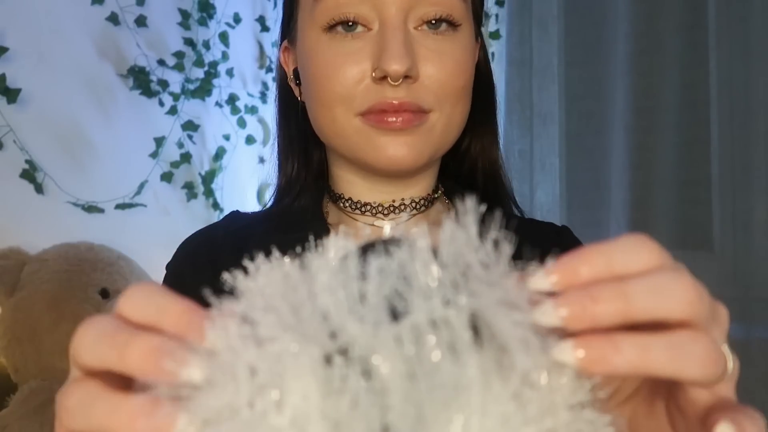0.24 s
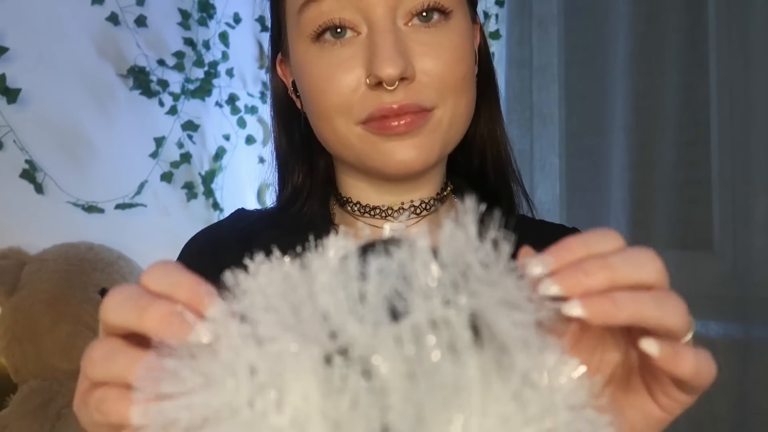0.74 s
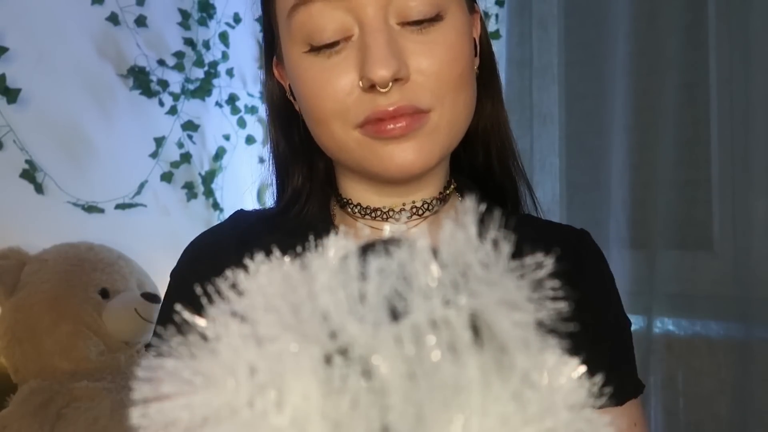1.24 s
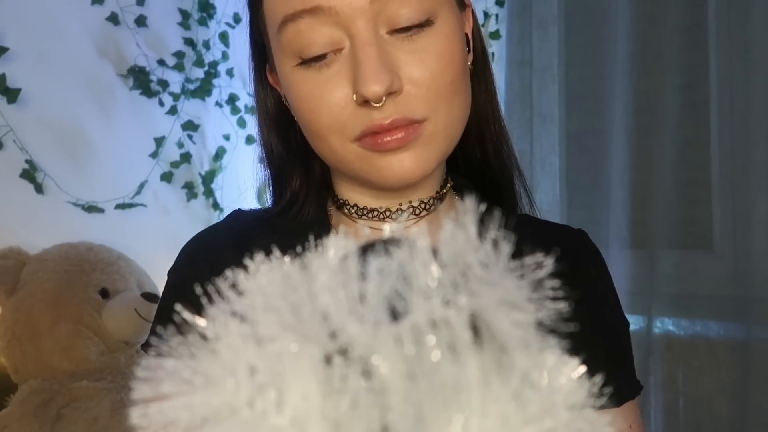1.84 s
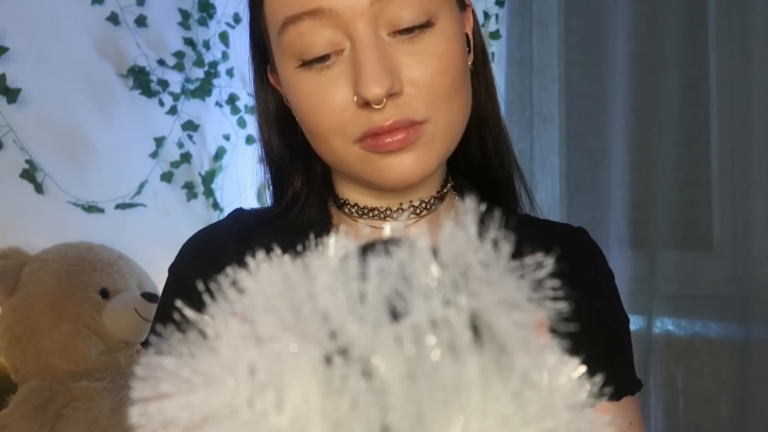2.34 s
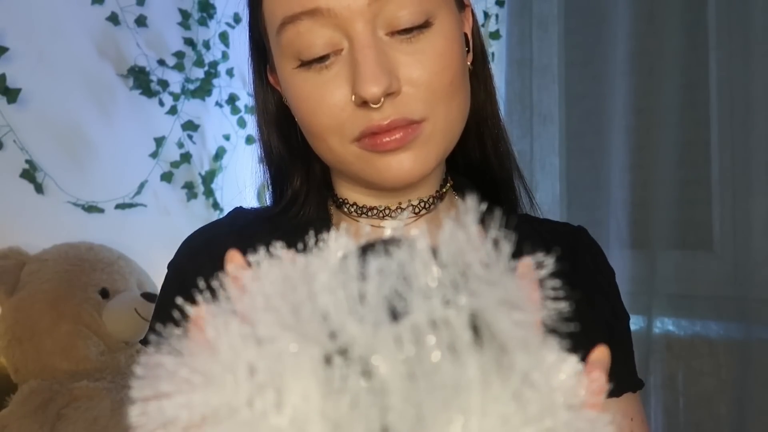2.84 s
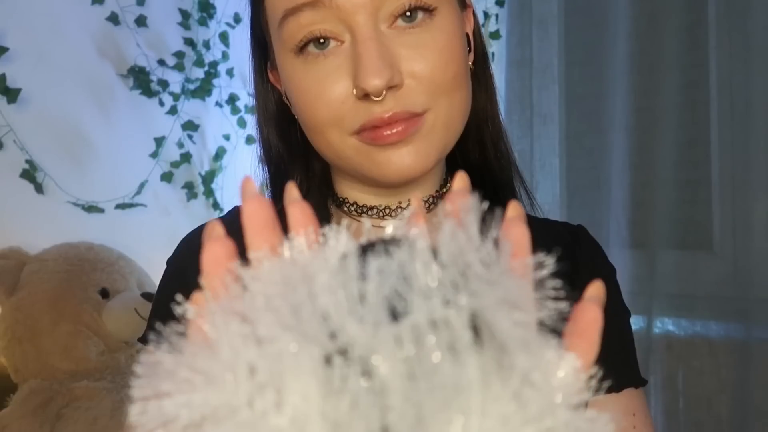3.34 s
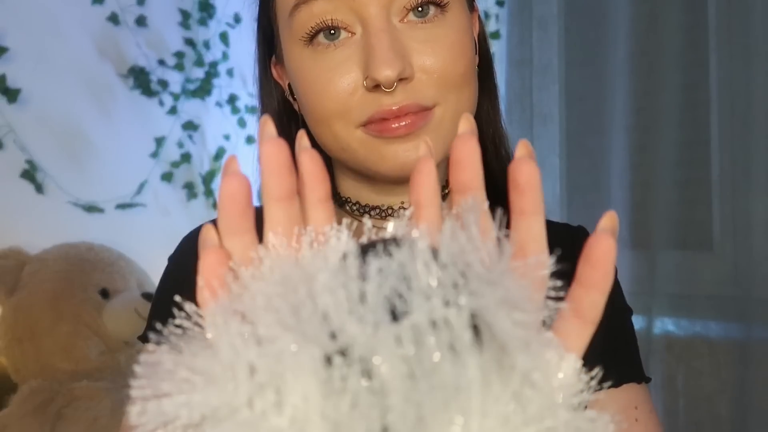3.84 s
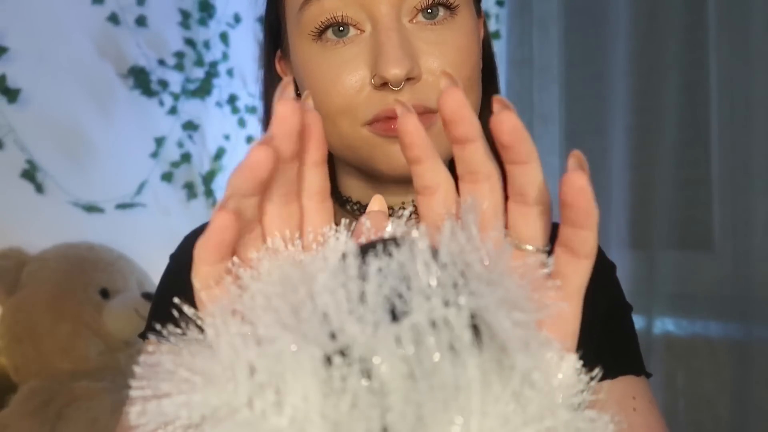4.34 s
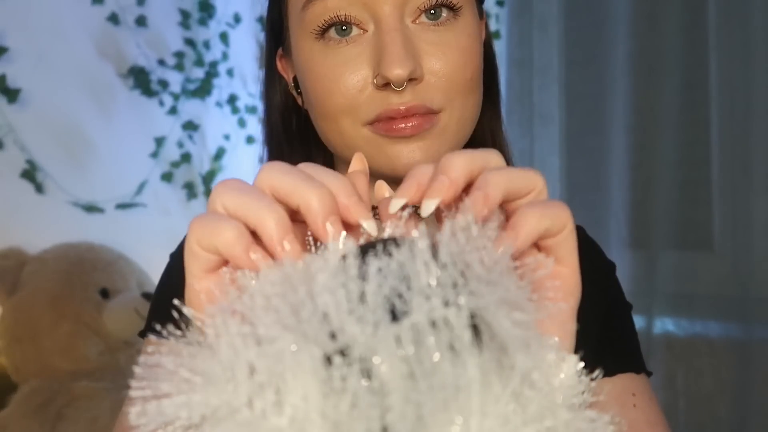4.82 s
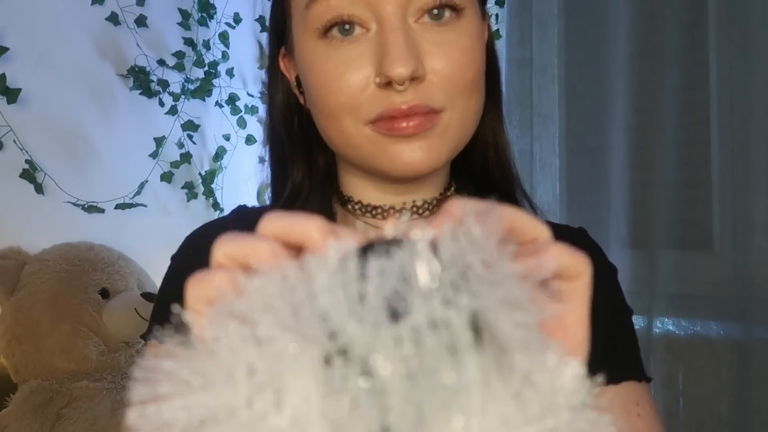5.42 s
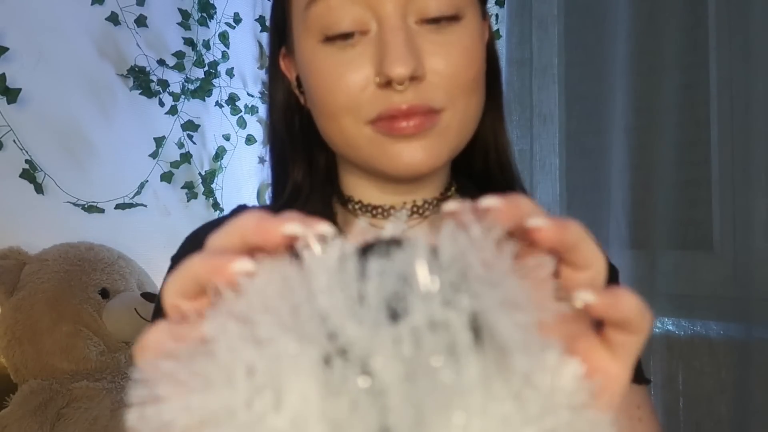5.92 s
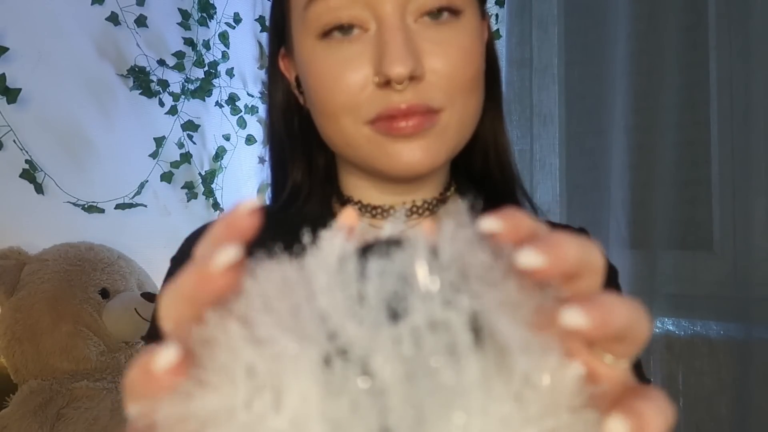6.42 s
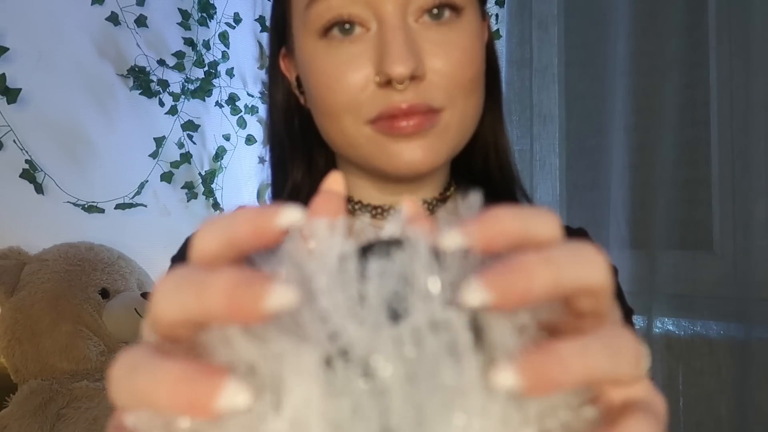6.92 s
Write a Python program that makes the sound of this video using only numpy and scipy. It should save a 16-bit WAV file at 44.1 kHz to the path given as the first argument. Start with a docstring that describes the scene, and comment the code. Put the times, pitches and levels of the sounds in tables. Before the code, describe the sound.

A tinsel garland wrapped over a microphone is handled in a quiet room, extremely close, dry and mono. From 0 to 0.3 s a bright crinkly burst with snaps, brushes and low lurches; it thins to light ticking and fades by 1 s. Until about 1.6 s there is almost nothing but faint room noise and very soft taps. From 1.7 s low rumble and a soft rustle creep back, swelling by 2.6 s, with one sharp snap near 2.4. From 2.6 to 4.7 s a continuous fine, gritty, fizzing rustle, slightly dipping around 4.2, over wavering low rumble. At 4.8 s a snap, sizzle and dull knock; then squeezing gets denser and brighter, with frequent snaps and lurching thumps at 5.4-5.9 s. After a slight easing near 6.5 s, a deep push follows, then a strong crackly brush and knock around 6.85 s, rustling on to the end at about 7.2 s.

```python
"""A quiet room: fingers stroke and squeeze a tinsel garland wrapped over a mono microphone.
Thousands of thin plastic strands rustle as damped ticks and noise, swelling in clumps.
Some strands snap free with a short ring and drag past their neighbours; bunches brush by and sizzle.
Pressure on the microphone body adds low rumble, lurches and dull knocks over faint room noise."""
import sys
import numpy as np
from scipy import signal
from scipy.fft import rfft, irfft, next_fast_len
from scipy.io import wavfile
from scipy.ndimage import uniform_filter1d, map_coordinates

SR = 44100
rng = np.random.default_rng(int(sys.argv[2]) if len(sys.argv) > 2 else 0)


def dump(signal):
    """Clip the signal to [-1, 1] and save it as 16-bit WAV at the path in sys.argv[1]."""
    limited = np.clip(np.atleast_2d(signal).T, -1, 1)
    pcm = np.round(limited * 32767).astype(np.int16)
    wavfile.write(sys.argv[1], SR, pcm)


N = 316197

# Stroke of the fingers, before layer trims: (time [s], rustle level [dB], sparkle over rustle [dB])
STROKE_CURVE = [(0.0, -60.5, 4.5), (0.14, -53.5, 2), (0.36, -59.5, 0), (0.7, -62, 2), (0.86, -67.5, 0.5),
                (1.0, -71, -6), (1.58, -71, -3.5), (1.66, -67.5, -7), (2.1, -59, -4), (2.6, -52.5, -4),
                (3.83, -51, -2), (4.2, -54.5, -1.6), (4.8, -51.5, -0.3), (5.12, -53.5, 0),
                (5.22, -50, -1.6), (5.9, -49.5, 1.5), (6.52, -52, -2), (6.56, -49, 0.5), (6.82, -50, 3),
                (7.17, -51, -2)]
# Grip on the housing, before random unevenness: (time [s], body rumble level [dB], push over body [dB])
GRIP_CURVE = [(0.0, -42.5, -15), (0.1, -40, -6), (0.7, -49.5, -0.5), (1.2, -68.5, -5), (1.55, -64, -1),
              (1.75, -53.5, -13), (2.35, -43, -6.5), (3.24, -42, -2), (3.8, -42.5, 1), (4.2, -43, -3),
              (4.8, -42, 2), (5.03, -44.5, -3), (5.17, -39.5, -3.5), (5.8, -40, 1), (6.48, -42, 2),
              (6.59, -38.5, 7.5), (6.67, -40, 0), (6.84, -37, 2), (6.93, -40.5, 0.5), (7.17, -41.5, -1.5)]
# Colour of strands under the palms: (frequency [Hz], relative level [dB])
PALM_COLOUR = [(900, -55), (1800, -10), (3000, -3.5), (4200, -1.5), (6500, -0.5), (8500, -3.5),
               (11000, -11), (17000, -40)]


def garland():
    """The rustle of many strands; bunches slipping lift it, some everywhere, some in one part."""
    # Strands at the grille: (frequency [Hz], relative level [dB])
    sparkle_colour = [(3000, -59), (6500, -3.5), (8500, -5.5), (11000, -2.5), (15000, -0.5), (18000, -24)]
    # Skin and strands on the grille: (frequency [Hz], relative level [dB])
    scuff_colour = [(250, -19), (450, 3), (700, -3), (1200, -8), (2200, -13), (4000, -21.5)]
    palms_db, grille_db, scuff_trim_db, crinkle_db = -1.2, 1.2, -14.5, -5.5  # layers against the stroke

    shared_bunch = np.minimum(clumps(rate=41, rise=0.0036, life=0.004, spike_db=2.0), 1.6)
    palm_swell = unit(1 + 0.27 * shared_bunch + 0.31 * local_bunches())
    grille_swell = unit(1 + 0.48 * shared_bunch + 0.66 * local_bunches())
    scuff_swell = unit((1 + 0.77 * shared_bunch) * amp(1.1 * wobble(12)))

    palms = ticks(5300, 0.33, cycles=1.23, spike_db=1.5, count=30000) + 1.9 * rng.standard_normal(N)
    grille = ticks(12730, 0.4, cycles=1.9, spike_db=2.0, count=30000) + 0.93 * rng.standard_normal(N)
    rustle = palm_swell * coloured(patchy(palms, patchy_db=1.5), PALM_COLOUR)
    sparkle = grille_swell * coloured(patchy(grille, patchy_db=2.0), sparkle_colour)
    scuff = scuff_swell * coloured(rng.standard_normal(N), scuff_colour)
    # Single strands heard apart, each a needle-sharp tick
    crinkle = ticks(9300, 0.25, cycles=0.72, spike_db=2.0, count=2500)

    rustle_db, sparkle_db = curves(STROKE_CURVE)
    rustle_db = rustle_db - 2.5 * np.maximum(wobble(35) - 0.3, 0)  # the fingers falter for a moment
    grip_db = curves(GRIP_CURVE)[0]
    # Scuffing is strongest when the fingers work at the grille
    scuff_db = 0.55 * rustle_db + 0.99 * sparkle_db + 0.3 * grip_db + scuff_trim_db
    return (amp(rustle_db + palms_db) * rustle
            + amp(rustle_db + sparkle_db + grille_db) * sparkle
            + amp(scuff_db) * scuff
            + amp(rustle_db + 1.05 * sparkle_db + crinkle_db) * crinkle)


def local_bunches():
    """Shorter, more uneven slips heard in one part of the garland only."""
    return np.minimum(clumps(rate=46, rise=0.0018, life=0.0036, spike_db=5.0), 2.4)


def clumps(rate, rise, life, spike_db):
    """Bunches of strands slip together: gain swells, rate a second, with rise and life time constants [s]."""
    starts = (rng.random(N) < rate / SR) * amp(spike_db * rng.standard_normal(N))
    after = signal.lfilter([1], [1, -np.exp(-1 / (life * SR))], starts)
    before = signal.lfilter([1], [1, -np.exp(-1 / (rise * SR))], starts[::-1])[::-1]
    return after + before - starts


def ticks(centre_hz, spread, cycles, spike_db, count):
    """Strands touch at random moments: tiny damped sines of uneven strength and pitch."""
    start = rng.integers(0, N, count)[:, None]
    hz = centre_hz * np.exp(spread * rng.standard_normal((count, 1)))
    hz = np.clip(hz, 2000, SR * 0.4)
    size = amp(spike_db * np.minimum(rng.exponential(1, (count, 1)), 5.5))
    k = np.arange(72)  # samples in one tick
    decay = np.exp(-k / SR * hz / cycles)
    grain = size * decay * np.sin(2 * np.pi * hz * k / SR)
    return unit(np.bincount((start + k).ravel(), grain.ravel(), N + len(k))[:N])


def snaps():
    """A bent strand creeps, springs free with a crack and a few cycles, then drags past its neighbours."""
    # Strands let go: (time [s], ring level [dB], pitch [Hz])
    snap_rows = [(0.0733, -27.0, 10000.0), (0.1198, -29.0, 7400.0), (0.1275, -26.5, 12100.0),
                 (0.373, -35.5, 13200.0), (0.4563, -35.0, 9600.0), (0.4788, -35.0, 7600.0),
                 (0.6065, -34.5, 12100.0), (0.6844, -29.5, 12200.0), (0.8214, -38.5, 14000.0),
                 (0.8601, -46.0, 7100.0), (1.6797, -50.0, 4700.0), (2.039, -39.0, 8600.0),
                 (2.1714, -35.0, 6200.0), (2.4083, -17.5, 14000.0), (2.6658, -34.0, 11000.0),
                 (2.7183, -33.0, 11500.0), (2.8973, -32.0, 6100.0), (3.1745, -32.0, 6800.0),
                 (3.2524, -30.5, 13300.0), (3.3334, -31.5, 12400.0), (3.9549, -33.0, 6900.0),
                 (4.295, -32.5, 12600.0), (4.3425, -34.0, 9800.0), (4.5557, -37.0, 6400.0),
                 (4.6098, -34.0, 8700.0), (4.7924, -33.0, 9500.0), (4.8334, -20.0, 9200.0),
                 (4.853, -27.0, 7900.0), (4.9672, -32.0, 7800.0), (5.0198, -28.5, 14900.0),
                 (5.0508, -37.0, 7400.0), (5.1439, -32.0, 6400.0), (5.1562, -33.0, 7300.0),
                 (5.2453, -29.0, 10000.0), (5.2646, -31.0, 4700.0), (5.3398, -30.0, 11500.0),
                 (5.3629, -20.5, 14600.0), (5.5227, -22.5, 14100.0), (5.5568, -25.0, 7000.0),
                 (5.6158, -25.5, 14700.0), (5.6452, -29.0, 9600.0), (5.7122, -31.0, 6500.0),
                 (5.7757, -28.0, 8200.0), (5.7842, -26.5, 14700.0), (5.8581, -26.0, 6300.0),
                 (5.8825, -33.0, 7800.0), (5.9937, -30.0, 8100.0), (6.0099, -31.0, 7100.0),
                 (6.0829, -31.0, 7700.0), (6.121, -25.5, 14400.0), (6.1709, -23.5, 13400.0),
                 (6.2688, -21.5, 12300.0), (6.3467, -33.0, 11300.0), (6.3759, -31.0, 9500.0),
                 (6.4671, -29.5, 13400.0), (6.7038, -27.0, 10600.0), (6.7448, -25.5, 13800.0),
                 (6.7563, -25.0, 9700.0), (6.9711, -28.5, 12700.0), (7.0558, -32.0, 7500.0)]
    rise_cycles, ring_cycles = 1.2, 12  # width of the rounded climb; cycles to fall by 60 dB
    slide_db, slide_grows = 4, 0.35  # drag over the rustle; its share of the snap's excess in dB

    clicks, drag = np.zeros(N + SR), np.zeros((2, N + SR))  # with half a second of margin at each end
    lead = SR // 50
    t = np.arange(-lead, SR // 5) / SR
    rustle_db = curves(STROKE_CURVE)[0]
    for s, db, hz in snap_rows:
        at = round(s * SR) + SR // 2 - lead
        around_db = rustle_db[round(s * SR)]
        climb = np.exp(-(t * hz / rise_cycles) ** 2)
        fall = amp(-60 * t * hz / ring_cycles)
        ring = np.where(t < 0, climb, fall) * np.cos(2 * np.pi * hz * t)
        # Noise tilted to the treble, 60 dB down 2 ms either side of the release
        crack = 0.12 * amp(-60 * np.abs(t) / 0.002) * np.diff(rng.standard_normal(len(t) + 1))
        clicks[at:][:len(t)] += amp(db) * (ring + crack)

        drag_db = around_db + slide_db + slide_grows * (db - around_db)
        creep_and_drag_db = np.where(t < 0, 60 * t / 0.0075 - 3, -60 * t / 0.025)
        drag[:, at:][:, :len(t)] += shares(hz) * amp(drag_db + creep_and_drag_db)
    return clicks[SR // 2:][:N] + dragging(drag[:, SR // 2:][:, :N] + brushes())


def dragging(gains):
    """Strands sliding over each other: gritty noise, bright at the grille and dull under the palms."""
    # A strand dragging past: (frequency [Hz], relative level [dB])
    slide_colour = [(300, -51), (800, -6.5), (2200, -5), (5000, -3), (8500, -0.5), (15000, -0.5),
                    (18000, 6.5)]
    bright, dull = gains
    return (bright * coloured(patchy(grit(), patchy_db=3.0), slide_colour)
            + dull * coloured(grit(), PALM_COLOUR))


def brushes():
    """Bunches sweep past the grille: gains of the bright and the dull drag."""
    # Sweeping bunches: (start [s], length [s], level [dB], brightness [Hz])
    brush_rows = [(0.0685, 0.01, -37.5, 12000), (0.114, 0.014, -39, 9000), (0.205, 0.028, -41, 11000),
                  (0.263, 0.025, -44.5, 12000), (0.438, 0.022, -48, 12000), (0.563, 0.012, -54, 12000),
                  (0.679, 0.007, -48.5, 12000), (0.73, 0.008, -53, 12000), (1.353, 0.045, -60, 9000),
                  (1.737, 0.01, -55, 7000), (1.868, 0.02, -57, 7000), (2.552, 0.057, -52, 6000),
                  (2.767, 0.007, -47, 13000), (2.868, 0.004, -47.5, 6000), (3.402, 0.01, -44, 13000),
                  (3.736, 0.095, -48, 7000), (4.017, 0.01, -43, 12000), (4.852, 0.038, -44, 9000),
                  (5.153, 0.062, -46, 8000), (5.203, 0.02, -45.5, 9000), (5.493, 0.029, -40.5, 10000),
                  (5.61, 0.02, -42, 12000), (5.75, 0.074, -46, 11000), (5.851, 0.008, -39, 9000),
                  (6.07, 0.064, -44, 10000), (6.545, 0.015, -50, 8500), (6.682, 0.025, -45, 12000),
                  (6.746, .022, -44, 11000), (6.821, 0.033, -35.5, 9000), (7.118, 0.043, -42.5, 8500)]
    return sum(amp(db) * shares(hz) * sweep(s, length) for s, length, db, hz in brush_rows)


def sizzles():
    """A narrow, quickly flickering band of gritty noise close to the grille."""
    # Bursts, before the flicker: (start [s], length [s], level [dB])
    sizzle_rows = [(0.06, .17, -61), (4.79, .14, -57), (4.96, .065, -54), (5.045, .015, -54),
                   (5.145, .02, -54), (6.56, .065, -55), (6.821, .04, -47)]
    # Band of the sizzle: (frequency [Hz], relative level [dB])
    sizzle_colour = [(6000, -42), (7300, -5), (8100, 0), (9000, -6), (10500, -42)]
    gain = sum(amp(db) * sweep(s, length) for s, length, db in sizzle_rows)
    flicker = amp(3.7 * wobble(90))
    return gain * flicker * coloured(grit(), sizzle_colour)


def grit():
    """Dense, very short strand ticks over noise."""
    return ticks(10200, 0.35, cycles=0.66, spike_db=-1.5, count=20000) + 3.0 * rng.standard_normal(N)


def shares(hz):
    """High sounds come from the grille and drag brightly: gains of the bright and the dull drag."""
    near = np.clip(np.log(hz / 3500) / 0.88, 0.05, 1)
    return np.sqrt([[near], [1 - near]])


def sweep(s, length):
    """Gain of one passing bunch: exponential rise, hold, exponential fall."""
    rise_s, fall_s = 0.001, 0.007  # time constants
    t = np.arange(N) / SR
    return np.exp(np.minimum(t - s, 0) / rise_s - np.maximum(t - s - length, 0) / fall_s)


def handling():
    """Uneven pressure shakes the capsule: slow stand sway, mount push and the hollow body's rumble."""
    # The stand rocking: (frequency [Hz], relative level [dB])
    sway_colour = [(8, -43), (16, -1.5), (30, -10.5), (48, -13.5), (75, -33), (150, -84)]
    # The mount flexing: (frequency [Hz], relative level [dB])
    push_colour = [(25, -43), (50, -1), (80, 2.5), (140, -8.5), (200, -11.5), (330, -100)]
    # The hollow housing: (frequency [Hz], relative level [dB])
    body_colour = [(71, -4.5), (120, -2.5), (221, -4), (302, -8.5), (352, -6), (385, -15), (480, -31.5),
                   (620, -42), (1060, -120)]
    sway_db, sway_rest_db = -1.6, -52  # over the push; the stand keeps rocking when let go

    body_db, push_db = curves(GRIP_CURVE)
    uneven = wobble(14)  # the grip tightens and loosens
    sway = unit(amp(0.98 * wobble(5.1))) * coloured(rng.standard_normal(N), sway_colour)
    push = unit(amp(1.66 * wobble(13) + 1.4 * uneven)) * coloured(rng.standard_normal(N), push_colour)
    body = unit(amp(1.2 * wobble(20) + 0.92 * uneven)) * coloured(rng.standard_normal(N), body_colour)
    sway_gain = np.hypot(amp(body_db + push_db + sway_db), amp(sway_rest_db))
    return sway_gain * sway + amp(body_db + push_db) * push + amp(body_db) * body


def knocks():
    """Pressure shakes the capsule: a damped low thump, with a higher and shorter ring on top."""
    # Knocks: (time [s], level [dB])
    knock_rows = [(0.858, -44.5), (1.295, -47.5), (1.578, -49), (1.641, -50), (1.748, -46), (4.023, -35.5),
                  (4.866, -29), (5.853, -28), (6.839, -29.5)]
    knock_hz = 235
    out, t = np.zeros(N + SR), np.arange(SR // 10) / SR
    cycles = knock_hz * t
    thump = amp(-4 * cycles) * np.sin(2 * np.pi * cycles)  # loses 4 dB a cycle
    tap = 0.4 * amp(-24 * cycles) * np.sin(2 * np.pi * 3.1 * cycles)
    for s, db in knock_rows:
        out[round(s * SR):][:len(t)] += amp(db) * (thump + tap)
    return out[:N]


def jolts():
    """The grip slips and the housing lurches once: a negative pulse with small positive shoulders."""
    # Lurches: (time of the peak [s], peak level [dB], width scale [s])
    jolt_rows = [(0.085, -28, 0.0065), (0.135, -30, 0.0066), (0.306, -32.5, 0.008), (4.803, -31, .007),
                 (5.406, -26.5, 0.0079), (5.474, -35, 0.0055), (5.558, -25.5, 0.0022), (5.671, -28, 0.0043),
                 (5.823, -27, 0.0067), (6.869, -28, 0.0055)]
    out, t = np.zeros(N + SR), np.arange(SR // 10) / SR
    for s, db, width in jolt_rows:
        u = (t - 0.05) / width  # the peak stands 50 ms into the pulse
        out[round((s - 0.05) * SR):][:len(t)] -= amp(db) * (1 - 1.6 * u ** 2) * np.exp(-0.8 * u ** 2)
    return out[:N]


def room():
    """Steady coloured noise for still air, electronics and a faint whine."""
    # Room and electronics: (frequency [Hz], relative level [dB])
    room_colour = [(40, -48), (90, -20), (215, 0.5), (320, -10.5), (730, -12), (1120, -12.5), (1210, -6.5),
                   (1300, -12), (2200, -17.5), (5000, -27.5), (16000, -56), (18000, -19)]
    room_db = -66.5  # rms
    return amp(room_db) * coloured(rng.standard_normal(N), room_colour)


def amp(db):
    """Decibels to gain."""
    return 10 ** (np.asarray(db) / 20)


def unit(x):
    """Scaled to rms 1."""
    return x / np.sqrt(np.mean(x ** 2) + 1e-20)


def wobble(rate):
    """A smooth random curve, rate knots a second."""
    knots = rng.standard_normal(int(N * rate / SR) + 4)
    return map_coordinates(knots, [np.arange(N) * rate / SR])


def curves(rows):
    """One value per sample for each column after the time."""
    s, *columns = np.transpose(rows)
    return [np.interp(np.arange(N) / SR, s, c) for c in columns]


def filtered(x, response):
    """x times a response of frequency."""
    m = next_fast_len(N + 8192)
    return irfft(rfft(x, m) * response(np.fft.rfftfreq(m, 1 / SR)), m)[:N]


def coloured(x, points):
    """x shaped by (frequency [Hz], level [dB]) points on a log axis, at rms 1."""
    f, db = np.transpose(points)

    def response(hz):
        return amp(np.interp(np.log(hz + 1), np.log(f + 1), db))

    return unit(filtered(x, response))


def patchy(x, patchy_db):
    """Each bunch has its own colour: random gain in streaks about 2 ms long and a few kilohertz tall."""
    z = signal.stft(x, nperseg=64)[2]
    field = uniform_filter1d(rng.standard_normal(z.shape), size=6, axis=0)  # across frequency
    field = uniform_filter1d(field, size=3, axis=1)  # across time
    return signal.istft(z * amp(patchy_db * unit(field)), nperseg=64)[1][:N]


def scene():
    """One capsule feeds both channels."""
    mono = garland() + snaps() + sizzles() + handling() + knocks() + jolts() + room()
    return np.array([mono, mono])


def record(dry):
    """Nothing is kept above the band limit."""
    top_hz = 15760
    return np.array([filtered(side, lambda hz: hz < top_hz) for side in dry])


dry = scene()
out = record(dry)
dump(out)
```